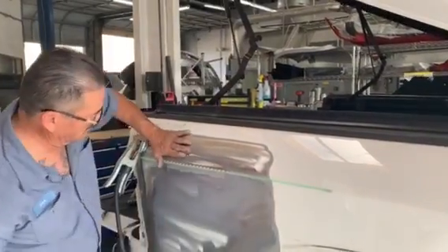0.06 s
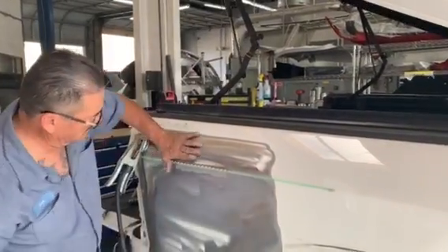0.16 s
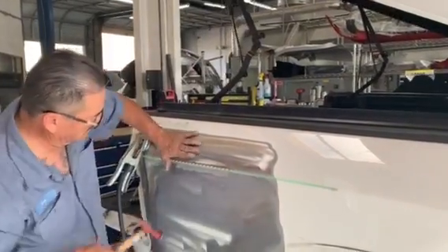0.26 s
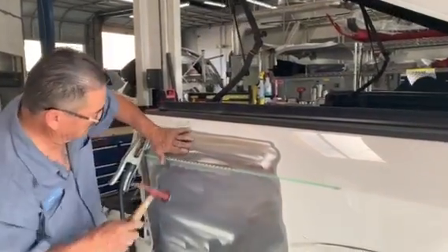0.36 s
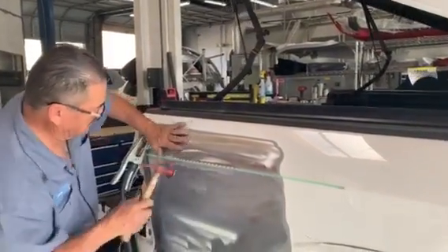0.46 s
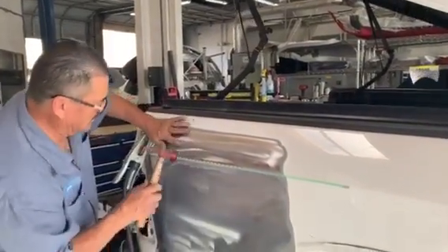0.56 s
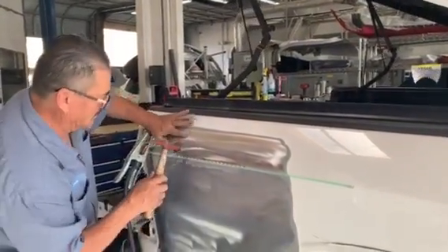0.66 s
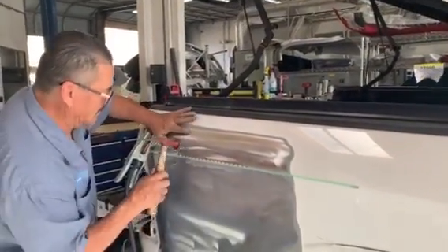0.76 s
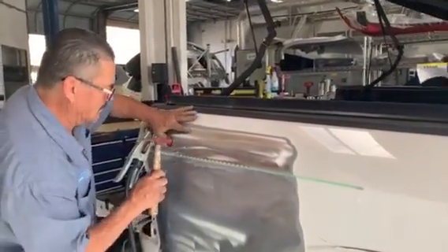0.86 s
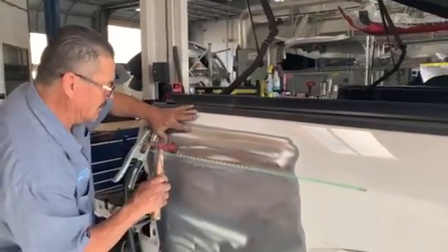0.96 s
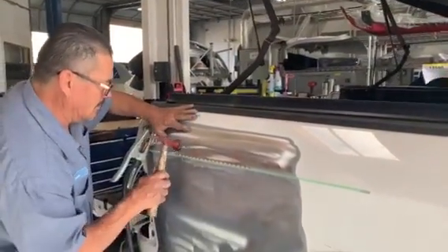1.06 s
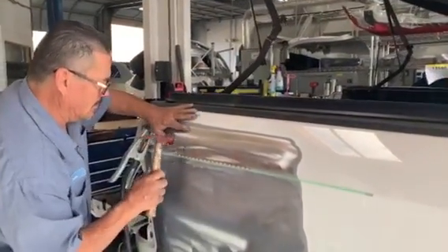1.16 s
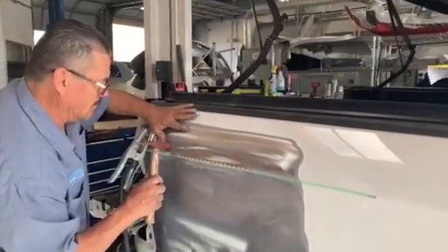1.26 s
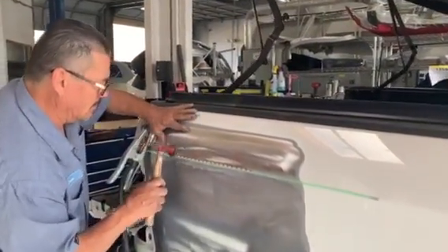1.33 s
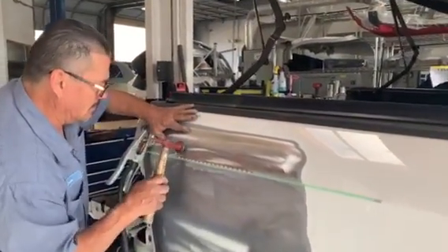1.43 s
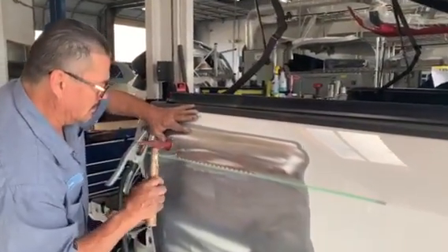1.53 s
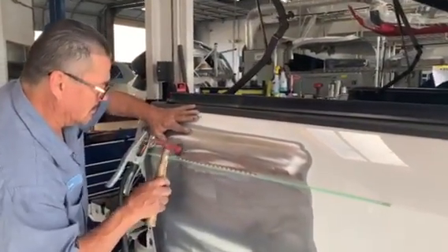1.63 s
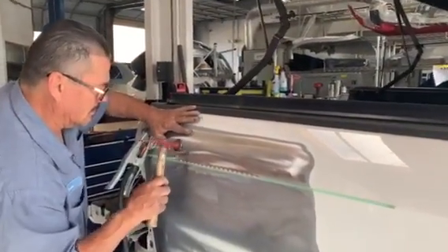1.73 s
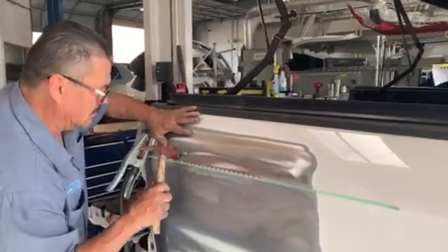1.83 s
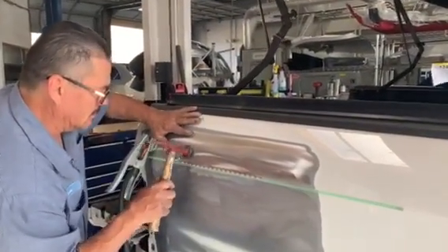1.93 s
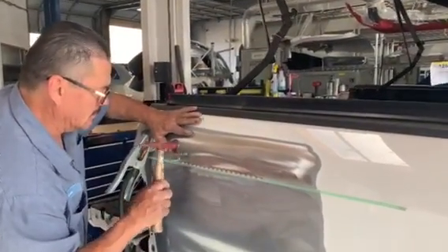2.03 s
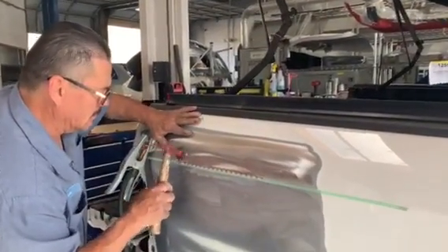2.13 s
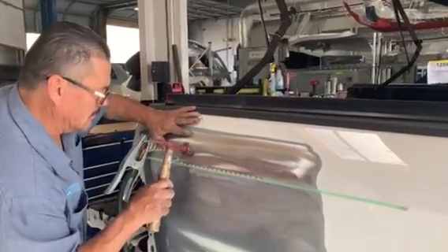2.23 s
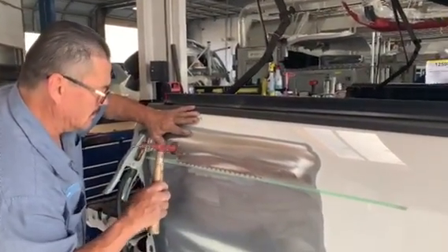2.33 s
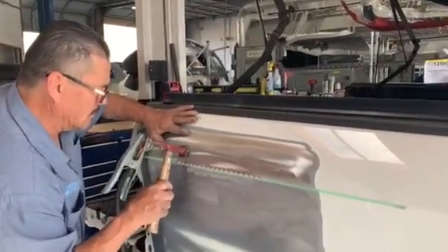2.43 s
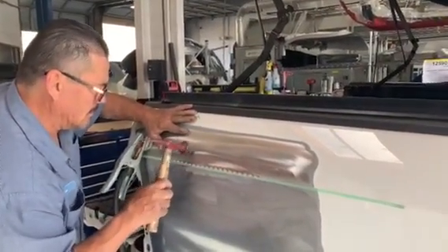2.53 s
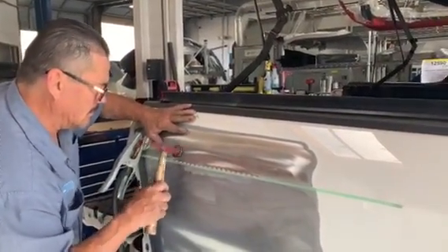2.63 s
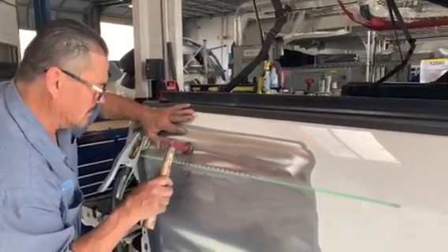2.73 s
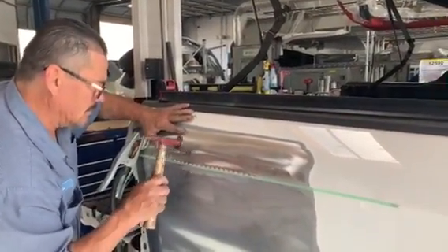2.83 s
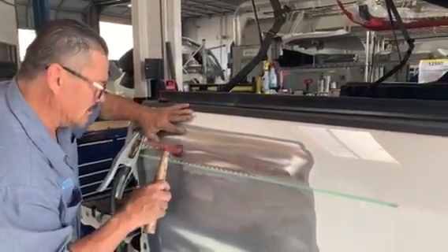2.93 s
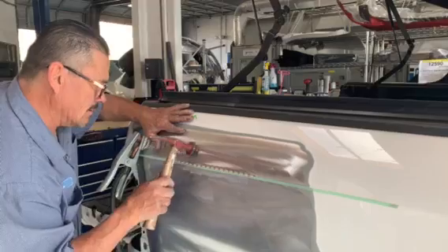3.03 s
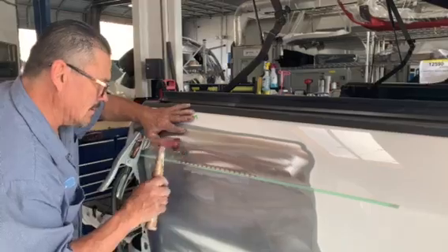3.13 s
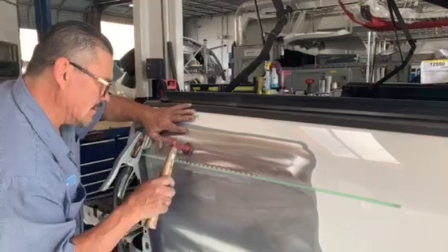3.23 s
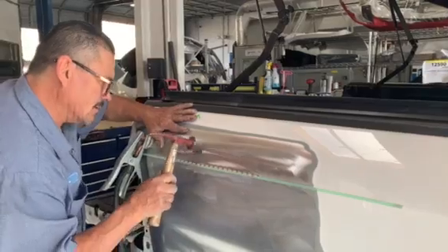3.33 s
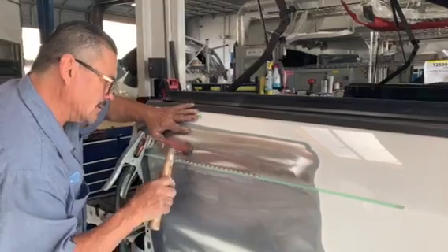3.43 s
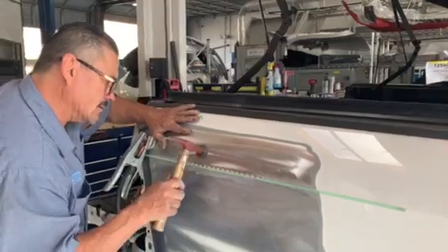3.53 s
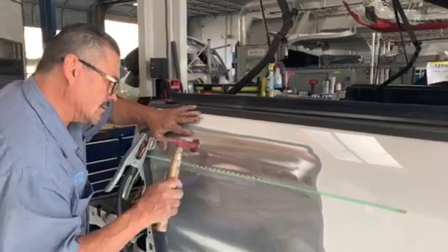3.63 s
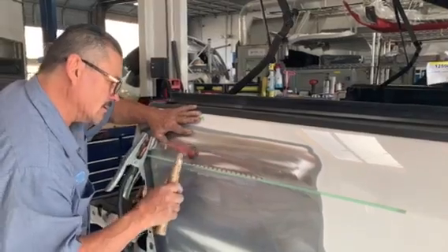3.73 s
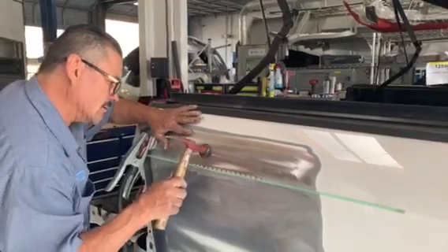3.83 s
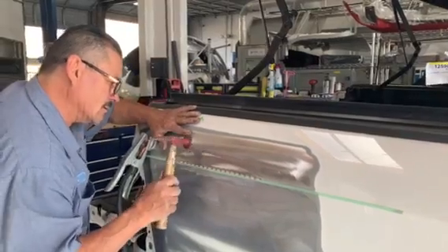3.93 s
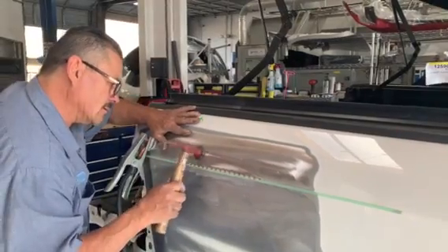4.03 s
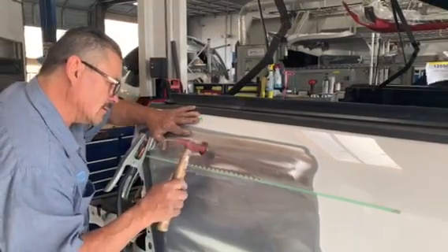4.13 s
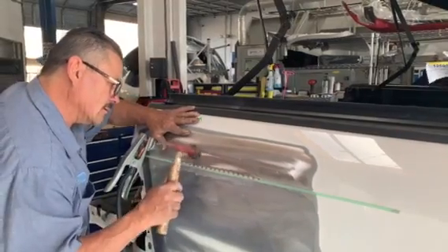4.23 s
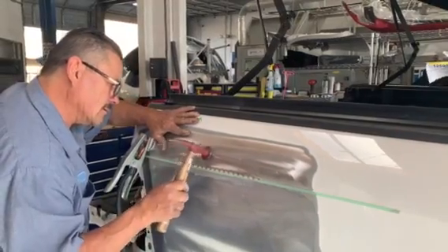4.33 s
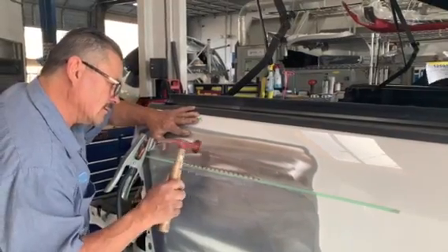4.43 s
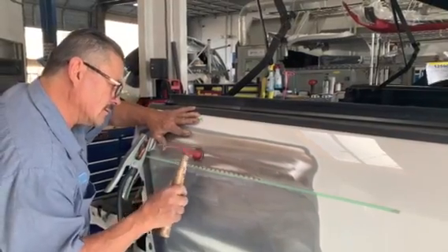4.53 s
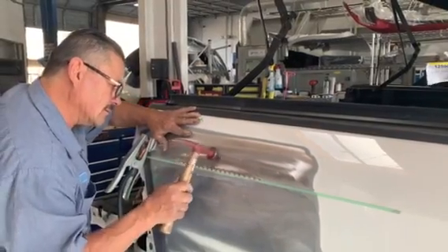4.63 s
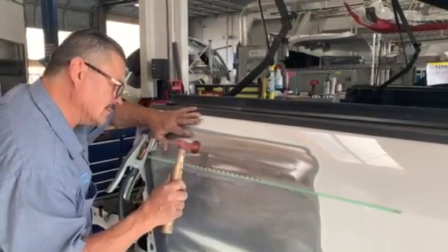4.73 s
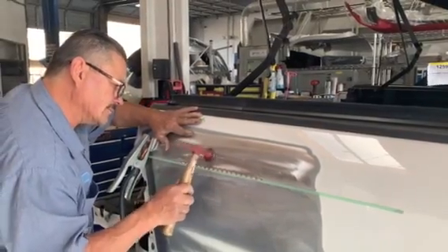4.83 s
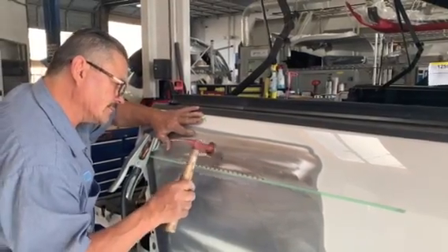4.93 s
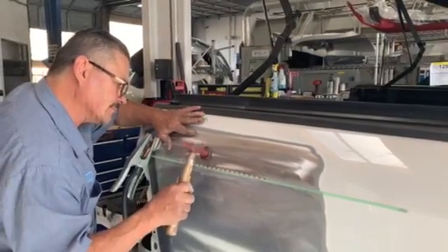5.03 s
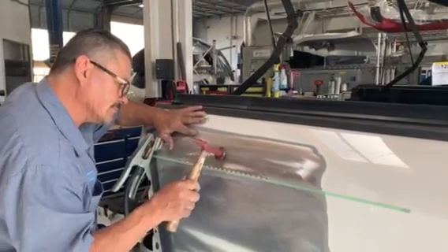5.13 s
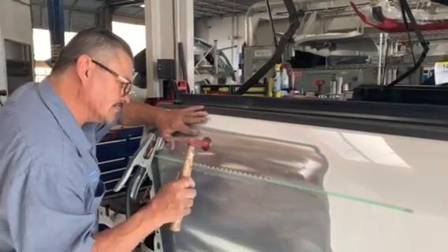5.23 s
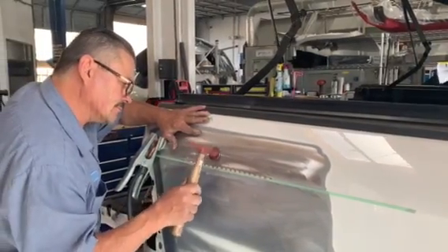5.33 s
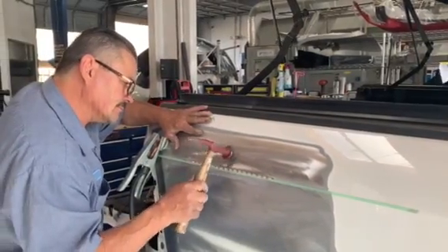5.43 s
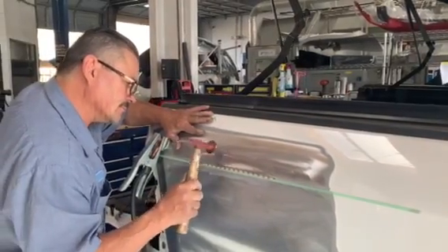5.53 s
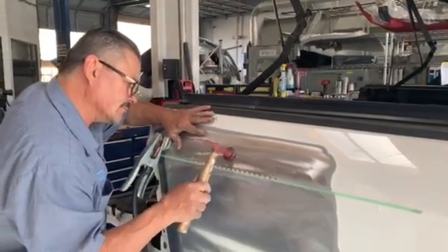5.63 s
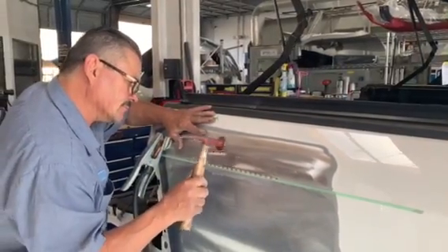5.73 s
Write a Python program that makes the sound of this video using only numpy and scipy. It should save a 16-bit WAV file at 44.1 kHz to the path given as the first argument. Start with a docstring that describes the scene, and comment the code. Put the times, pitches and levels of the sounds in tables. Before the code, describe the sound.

Close, even hammer taps on sheet metal, nearly four a second, with a short hollow ring and workshop echo.

```python
"""A large workshop: a hammer taps evenly along a steel body panel, close to a two-port microphone.
Each tap knocks and cracks, the sheet booms and rings in its modes, nearby surfaces slap back,
and the hall answers a moment later with a wash. The tone shifts as the hammer works along the panel.
Underneath lie a lumpy low rumble with a few soft thumps, a thin hiss and faint whines;
before the first tap, a hand swishes over the sheet."""
import sys
import numpy as np
from scipy import signal
from scipy.fft import rfft, irfft
from scipy.io import wavfile
from scipy.ndimage import uniform_filter1d

SR = 44100
rng = np.random.default_rng(int(sys.argv[2]) if len(sys.argv) > 2 else 0)


def wrap_up_sound(samples):
    """Save the sound to the file named by the first command line argument, as 16-bit audio."""
    columns = np.atleast_2d(samples).T
    # keep every value between -1 and 1, then stretch to whole-number steps
    tamed = np.clip(columns, -1, 1)
    steps = np.round(tamed * 32767).astype(np.int16)
    wavfile.write(sys.argv[1], SR, steps)


N = 254266

# colours of the noise beds: (frequency [Hz], relative level [dB])
RUMBLE_COLOUR = [(15, -25), (25, -8), (40, -7), (70, -2.5), (125, -4), (200, -14.5), (255, -9.5),
                 (300, -14), (400, -21), (800, -30.5), (1360, -37.5), (2500, -54)]
HISS_COLOUR = [(900, -1), (1300, 13.5), (1600, 5.5), (1860, 11.5), (2400, 3), (4200, -2.5), (5600, -2),
               (8200, -18), (13500, -22), (16000, -11.5)]
HAND_COLOUR = [(2000, -12), (4200, -8.5), (5600, -15.5), (8200, -3.5), (13500, -7), (16000, -10.5)]
# slow ride of the rumble: (time [s], level [dB])
RUMBLE_RIDE = [(0, -27.5), (1.6, -21), (3.8, -32.5), (5.77, -29.5)]
# steady tones of the workshop: (pitch [Hz], level [dB])
WHINE_TONES = [(1242, -62), (1261, -64), (1847, -65), (2702, -68), (2822, -73)]
# hand sliding on the sheet: (loudest at [s], level [dB], rise [s], fall [s])
HAND_STROKES = [(.11, -40, 0.16, .13), (.4, -44, .12, 0.19)]
# soft thumps in the rumble: (time [s], level [dB], pitch [Hz])
THUMP_CUES = [(0.097, -15.5, 121), (0.138, -18, 109), (0.445, -23, 139), (0.6305, -4.5, 117),
              (0.951, -29, 264), (0.968, -24, 150), (1.304, -8, 125)]
# hollow ring of a thump: (pitch [Hz], relative level [dB])
HOLLOW_MODES = [(290, 4.5), (430, -1), (620, -6), (820, -11), (1080, -14)]
# hammer hits: (time [s], blow [dB], hardness [dB], head ping [dB], sheet boom [dB])
TAP_CUES = [(1.022, -3, 1.5, 3, -1.5), (1.3434, -1, -2, 3.5, -1.5), (1.6222, -2.5, -2.5, 4.5, -1),
            (1.8841, -3.5, 2, 4, 1.5), (2.1476, -4.5, 3.5, -1.5, 0.5), (2.4153, -5, 2.5, -15, 1),
            (2.6851, -5.5, 1, -3, 0), (2.9599, -5.5, 1.5, -1, 0.5), (3.2247, -6, 2, -3, 3),
            (3.4988, -5, 2.5, 5, 0.5), (3.7724, -5, 0.5, 4.5, 0), (4.0418, -5, 3.5, -1.5, -0.5),
            (4.3056, -6, -0.5, 7, 0), (4.5658, -5.5, 0.5, 0, -0.5), (4.8296, -6.5, 2.5, 3, 3),
            (5.0937, -6, 1.5, 1, 1.5), (5.3574, -5.5, 5, 1, -1), (5.622, -6.5, 6, 6, 2.5)]
# short rings of head and struck spot: (pitch [Hz], near level [dB], far level [dB], t60 [s])
KNOCK_MODES = [(436, -3, -17, 0.021), (744, -6.5, -19, 0.03), (1119, -23, -15, 0.049),
               (1380, -19.5, -17.5, 0.045), (1636, -9, -17.5, 0.027), (1919, -22, -11, 0.044),
               (2260, -28.5, -25, 0.018), (2870, -25, -26.5, 0.0042), (4950, -9, -7, 0.0027),
               (4090, -27, -16, 0.0094), (4340, -16, -20.5, 0.021), (7330, -5, -10.5, 0.0027),
               (8100, -5.5, -1.5, 0.0026), (13250, -3.5, -4, 0.0016)]
# modes of the sheet: (pitch [Hz], near level [dB], far level [dB], t60 [s])
SHEET_MODES = [(100.3, -11, -13, 0.52), (131.7, -8, -5, 0.45), (154.7, -14, -22.5, 0.92),
               (190.7, -5, -4, 0.36), (219.7, -10.5, -2.5, 0.44), (242.7, -14.5, -17, 0.55),
               (278.6, -14.5, -15, 0.86), (312.5, -6, -26, 0.9), (353.5, -6.5, -18, 0.71),
               (384, -8.5, -22.5, 0.83), (431.6, -25, -12, 0.42), (493.5, -25.5, -22, 0.18),
               (568, -19, -22, 0.38), (610, -17, -20.5, 0.39), (667, -15.5, -30.5, 0.62),
               (715, -18, -37, 0.74), (803, -18, -20, 0.43), (886, -26, -36, 0.58), (960, -27, -30, 0.12),
               (1010, -34, -16.5, 0.21), (1088, -29, -25.5, 0.38), (1190, -25.5, -22, 0.52),
               (1383, -22, -18, 0.35), (1497, -32, -26.5, 0.19), (1850, -23, -19.5, 0.28),
               (2000, -37, -19, 0.062), (2290, -40, -28.5, 0.44)]
# noise in a tap: (band centre [Hz], crack [dB], crack t60 [s], near wash [dB], far wash [dB],
# wash swell [s], wash t60 [s])
TAP_BANDS = [(70.4, -39, .06, -2, -32, 0.0071, 0.19), (178.4, -38, 0.023, -10, -3, 0.0089, 0.56),
             (246, -3, 0.035, -5.5, -10.5, 0.019, 0.71), (365, -9, 0.013, -10, -10.5, 0.029, 0.57),
             (655, -12.5, 0.019, -11, -16.5, 0.0093, 0.57), (1120, -14, 0.037, -17.5, -17.5, 0.0043, 0.69),
             (2124, -22.5, 0.084, -21, -19, 0.007, 0.5), (3000, -24.5, 0.15, -25.5, -23.5, 0.0062, 0.41),
             (4450, -35, 0.04, -25, -21.5, 0.009, 0.41), (5400, -20, 0.086, -23.5, -24, 0.0063, 0.33),
             (7370, -43, 0.03, -31, -24, 0.0084, 0.33), (8930, -22, 0.044, -23, -24, 0.0036, 0.27),
             (9520, -11, 0.058, -26, -25, 0.014, 0.49), (12100, -20, 0.042, -22, -18, .012, 0.25),
             (15100, -20, 0.017, -21.5, -22, 0.014, 0.23), (17000, -10, .04, -46, -24, 0.0075, 0.28)]
# noise that all taps share: (frequency [Hz], amplitude share [0-1])
TAP_SHARE = [(2000, .76), (5000, .55)]
# slap off nearby surfaces: (delay [s], level [dB])
SLAPS = [(.0045, -10.5), (.009, -15), (0.0207, -11.5), (0.0247, -7.5), (.031, -14), (.046, -17.5)]
# how alike the two ports sound: (frequency [Hz], likeness [0-1])
PORT_LIKENESS = [(40, 0.73), (160, 0.83), (350, 0.82), (700, 0.59), (1400, 0.067), (2800, 0.14),
                 (5500, 0.31), (9000, 0.84), (14000, 0.64)]
# left port over right: (frequency [Hz], level [dB])
PORT_BALANCE = [(60, 1.5), (110, -1), (200, -1), (380, -1), (700, 0.5), (1290, 1), (2380, 1), (4400, -1),
                (8120, -1), (15000, 0.5)]
# left port ahead of right: (frequency [Hz], phase [rad])
PORT_PHASE = [(0, 0), (1030, -0.3), (2930, 1.9), (4310, 0.1), (4910, -2.9), (5860, -3.6), (6890, -6.1),
              (8180, -6.5), (9730, -9.2), (11600, -9.8), (12500, -12.2), (14400, -12.6), (15800, -15.4),
              (16200, -15.2)]

BOOM_BELOW_HZ, PING_FROM_HZ, PING_TO_HZ = 260, 4000, 4500
LEAVES_S, TRAVEL_S, SPEEDING = 1.05, 2.25, 1.1  # the hammer leaves the near end, speeds up, then stays
TAP_N = 20000  # samples in one tap
TIME, TAP_TIME, TAP_HZ = np.arange(N) / SR, np.arange(TAP_N) / SR, np.fft.rfftfreq(TAP_N, 1 / SR)


def gain_of(db):
    return 10 ** (np.asarray(db) / 20)


def unit_rms(x):
    return x / np.sqrt(np.mean(x ** 2) + 1e-20)


def curve_at(points, hz):
    f, value = np.transpose(points)
    return np.interp(np.log(hz + 1), np.log(f + 1), value)


def add(mix, s, sound):
    part = mix[:, round(s * SR):][:, :sound.shape[1]]
    part += sound[:, :part.shape[1]]


def left_port(hz):
    """Gain and phase of the left port against the right."""
    return gain_of(curve_at(PORT_BALANCE, hz)) * np.exp(1j * curve_at(PORT_PHASE, hz))


def at_ports(noise, hz):
    """Two noise spectra blended into a partly alike stereo pair."""
    same = np.clip(curve_at(PORT_LIKENESS, hz), 0, 1)
    return np.array([noise[0] * left_port(hz), same * noise[0] + np.sqrt(1 - same ** 2) * noise[1]])


def wander(rate_hz):
    """Slow random drift of rms 1."""
    low = signal.butter(2, rate_hz, fs=SR, output="sos")
    return unit_rms(signal.sosfilt(low, rng.standard_normal(N + SR))[SR:])


def noise_bed(colour):
    """Steady stereo noise of a given colour."""
    hz = np.fft.rfftfreq(N, 1 / SR)
    white = at_ports(rfft(rng.standard_normal((2, N))), hz)
    return unit_rms(irfft(white * gain_of(curve_at(colour, hz)), N))


def rumble():
    """Low noise that comes in lumps."""
    ride_db = np.interp(TIME, *np.transpose(RUMBLE_RIDE))
    return gain_of(ride_db + 2.36 * wander(rate_hz=15.8)) * noise_bed(RUMBLE_COLOUR)


def hiss(level_db=-47.5):
    """Thin noise whose level barely drifts."""
    return gain_of(level_db + 0.23 * wander(rate_hz=18)) * noise_bed(HISS_COLOUR)


def whines(waver_db=3.0):
    """Thin tones whose level wavers."""
    return sum(np.sqrt(2) * gain_of(db + waver_db * wander(rate_hz=4))
               * np.sin(2 * np.pi * (hz * TIME + rng.random((2, 1)))) for hz, db in WHINE_TONES)


def hand_swishes(drop_db=-13.5, air_db=-53.5):
    """The hand slides on the sheet: each stroke swells and fades over faint air of the same colour."""
    level = gain_of(air_db)
    for s, db, rise, fall in HAND_STROKES:
        from_peak = (TIME - s) / np.where(TIME < s, rise, fall)
        level = level + gain_of(db + drop_db * np.minimum(from_peak ** 2, 20))
    return level * noise_bed(HAND_COLOUR)


def thumps(attack_s=0.0032, t60=0.034, hollow_db=-5):
    """Short dull bumps: a low damped swing with a hollow ring above it."""
    out, t = np.zeros((2, N)), np.arange(4000) / SR
    for s, db, hz in THUMP_CUES:
        hollow = sum(gain_of(hollow_db + mode_db) * np.sin(2 * np.pi * (mode_hz * t + rng.random()))
                     for mode_hz, mode_db in HOLLOW_MODES)
        envelope = gain_of(db - 60 * t / t60) * (1 - np.exp(-t / attack_s))
        add(out, s, envelope * (np.sin(2 * np.pi * hz * t) + hollow)[None])
    return out


def along(near_db, far_db, place):
    """Power cross-fade from the panel's near end (place 0) to the farthest spot struck (1)."""
    return 10 * np.log10((1 - place) * gain_of(near_db) ** 2 + place * gain_of(far_db) ** 2)


def knock(place, ping_db):
    """Hammer head and struck spot ring briefly, a little differently on every hit."""
    hz, near_db, far_db, t60 = np.array(KNOCK_MODES).T[:, :, None]
    scatter, detune = rng.standard_normal((len(hz), 2)).T[:, :, None]
    db = along(near_db, far_db, place) + 1.6 * scatter + ping_db * (hz > PING_FROM_HZ) * (hz < PING_TO_HZ)
    rings = gain_of(db - 60 * TAP_TIME / t60) * np.sin(2 * np.pi * hz * (1 + 0.02 * detune) * TAP_TIME)
    return rings[::2].sum(0) - rings[1::2].sum(0)  # neighbours start in opposite directions


def crack(band_noise, attack_samples=10):
    """The bite of the impact: a noise burst that dies at its own rate in each band."""
    db, t60 = np.array(TAP_BANDS).T[1:3, :, None]
    attack = 1 - np.exp(-TAP_TIME * SR / attack_samples)
    return (attack * gain_of(db - 60 * TAP_TIME / t60) * band_noise).sum(0)


def sheet_ring(place, boom_db, near_cycles=2.9, far_cycles=1.5):
    """The modes build over a few cycles; each tap rings at slightly different levels and pitches."""
    hz, near_db, far_db, t60 = np.array(SHEET_MODES).T[:, :, None]
    scatter, phase, detune = rng.standard_normal((len(hz), 3)).T[:, :, None]
    db = along(near_db, far_db, place) + 1.7 * scatter + boom_db * (hz < BOOM_BELOW_HZ)
    build = 1 - np.exp(-TAP_TIME * hz / (near_cycles + place * (far_cycles - near_cycles)))
    tones = np.sin(2 * np.pi * hz * (1 + 0.009 * detune) * TAP_TIME + 0.45 * phase)
    return (build * gain_of(db - 60 * TAP_TIME / t60) * tones).sum(0)


def with_slap(sound, send_db=0, soak_db_per_khz_ms=-0.25):
    """A sound and its echoes off nearby surfaces, which soak up treble, as both ports hear them."""
    echoes = sum(gain_of(db + soak_db_per_khz_ms * TAP_HZ * s) * np.exp(-2j * np.pi * TAP_HZ * s)
                 for s, db in SLAPS)
    spectrum = rfft(sound) * (1 + gain_of(send_db) * echoes)
    return irfft(np.array([spectrum * left_port(TAP_HZ), spectrum]))


def hall_wash(band_noise, place, boom_db, delay_s=0.0093, clatter_db=3.5, clatter_s=0.043):
    """The wash of sheet and hall swells after a delay; first reflections make its top end clatter."""
    hz, _, _, near_db, far_db, swell_s, t60 = np.array(TAP_BANDS).T[:, :, None]
    lumps = unit_rms(uniform_filter1d(uniform_filter1d(rng.standard_normal(TAP_N), 130), 90))
    lumps_db = clatter_db * lumps * np.exp(-TAP_TIME / clatter_s) * (hz > 900)
    db = along(near_db, far_db, place) + boom_db * (hz < BOOM_BELOW_HZ) + lumps_db
    swell = 1 - np.exp(-np.maximum(TAP_TIME - delay_s, 0) / swell_s)
    return (swell * gain_of(db - 60 * TAP_TIME / t60) * band_noise).sum(1)


def band_filters():
    """Overlapping bands that split a tap's noise, each scaled to the same power."""
    centres = np.array(TAP_BANDS)[:, 0]
    bands = np.sqrt([curve_at(np.c_[centres, row], TAP_HZ) for row in np.eye(len(centres))])
    return bands * TAP_N / np.sqrt(4 * (bands ** 2).sum(1, keepdims=True))


def tap_noise():
    """Three white spectra: two for the wash, one for the crack."""
    return rfft(rng.standard_normal((3, TAP_N))) / np.sqrt(TAP_N)


def hammer_taps():
    """The hammer works along the panel: each hit layers knock, crack, ringing sheet and wash."""
    out, bands = np.zeros((2, N)), band_filters()
    fade_out = np.clip((TAP_N - 400 - np.arange(TAP_N)) / 4000, 0, 1)
    common, share = tap_noise(), curve_at(TAP_SHARE, TAP_HZ)
    for s, blow_db, hard_db, ping_db, boom_db in TAP_CUES:
        place = np.clip((s - LEAVES_S) / TRAVEL_S, 0, 1) ** SPEEDING
        noise = share * common + np.sqrt(1 - share ** 2) * tap_noise()
        tail = hall_wash(irfft(at_ports(noise, TAP_HZ)[:, None] * bands), place, boom_db)
        body = with_slap(sheet_ring(place, boom_db), send_db=-2)
        attack = with_slap(knock(place, ping_db) + crack(irfft(noise[2] * bands)))
        add(out, s, gain_of(blow_db) * (gain_of(hard_db) * attack + body + tail) * fade_out)
    return out


def scene():
    return hammer_taps() + thumps() + rumble() + hand_swishes() + hiss() + whines()


def record(dry, gap_from_hz=9750, gap_to_hz=11550, gap_db=-25, top_hz=16400):
    """Loud peaks round off; the sound has a gap in the treble around 10-11 kHz and no extreme top."""
    rounded = 1.2 * np.tanh(dry / 1.2)
    corners_hz = [0, gap_from_hz - 250, gap_from_hz + 250, gap_to_hz - 250, gap_to_hz + 250, SR / 2]
    notch = signal.firwin2(255, corners_hz, gain_of([0, 0, gap_db, gap_db, 0, 0]), fs=SR)
    high_cut = signal.firwin(511, top_hz, window=("kaiser", 9), fs=SR)
    return signal.oaconvolve(rounded, np.convolve(notch, high_cut)[None], "same")


dry = scene()
out = record(dry)
wrap_up_sound(out)
```